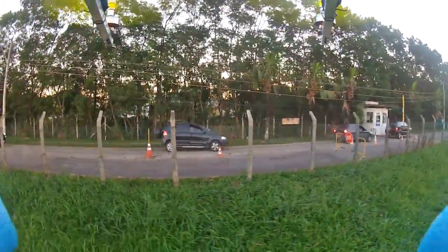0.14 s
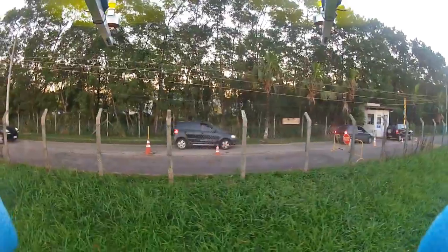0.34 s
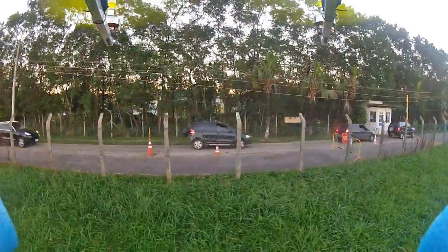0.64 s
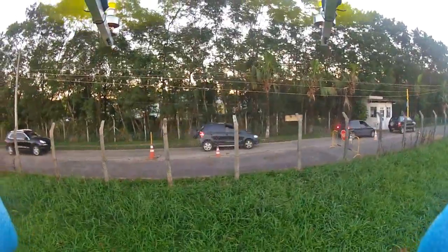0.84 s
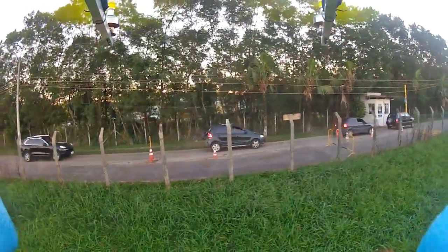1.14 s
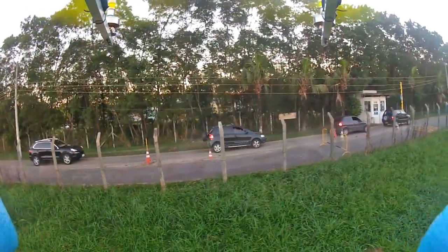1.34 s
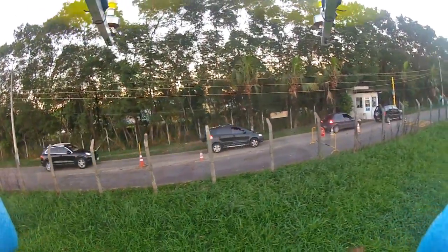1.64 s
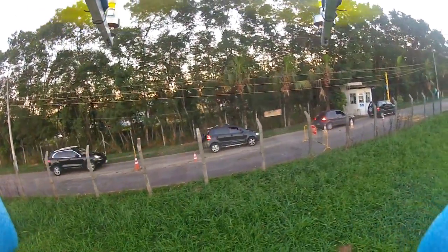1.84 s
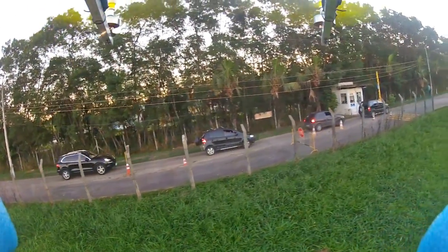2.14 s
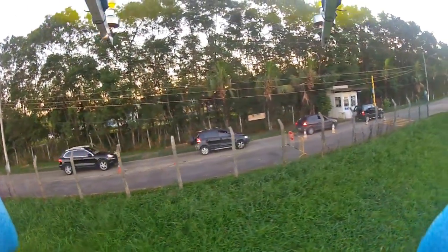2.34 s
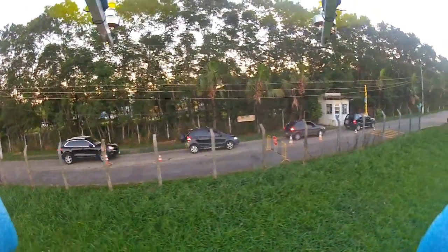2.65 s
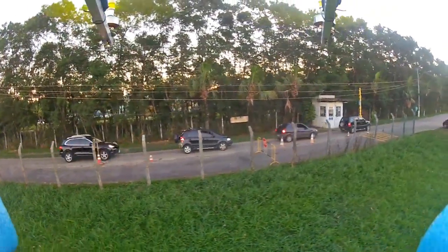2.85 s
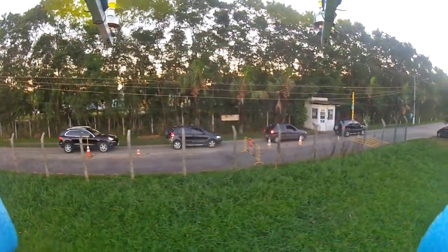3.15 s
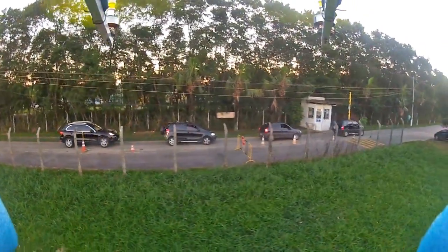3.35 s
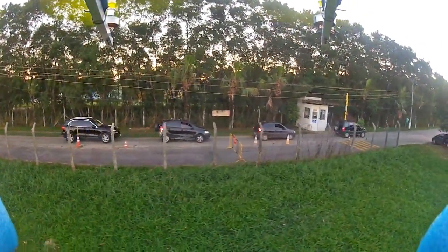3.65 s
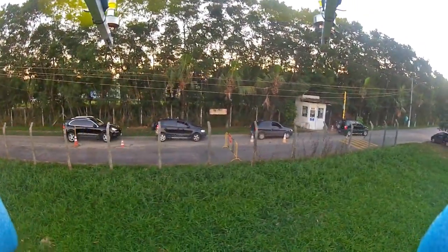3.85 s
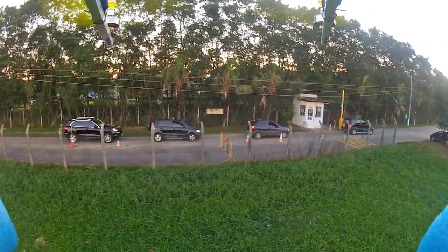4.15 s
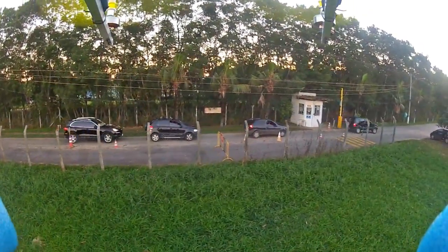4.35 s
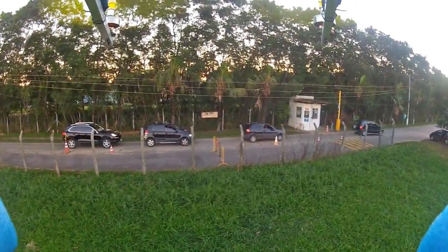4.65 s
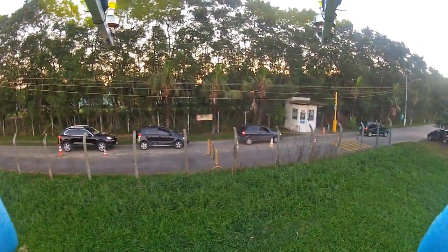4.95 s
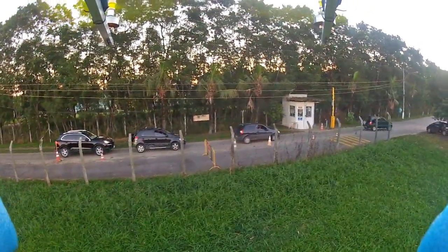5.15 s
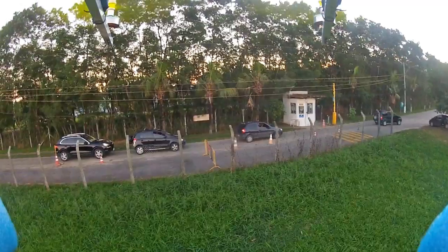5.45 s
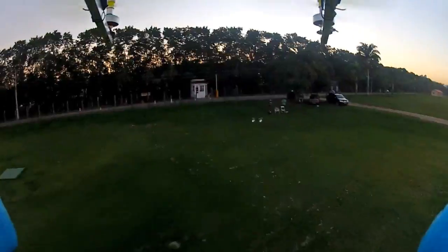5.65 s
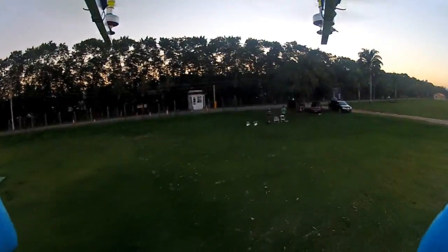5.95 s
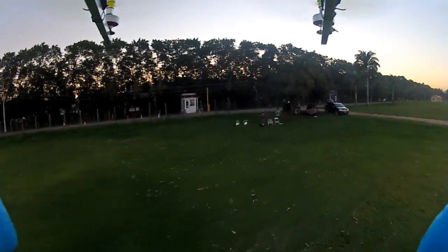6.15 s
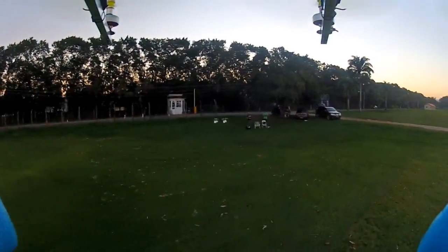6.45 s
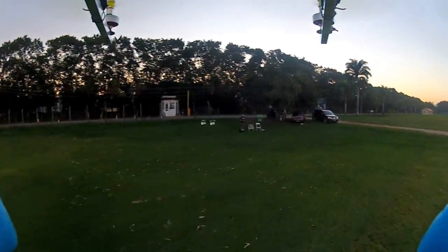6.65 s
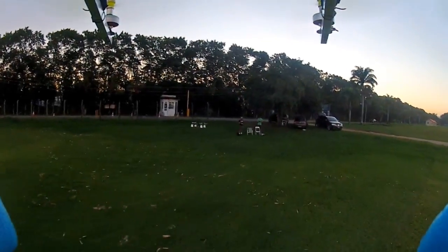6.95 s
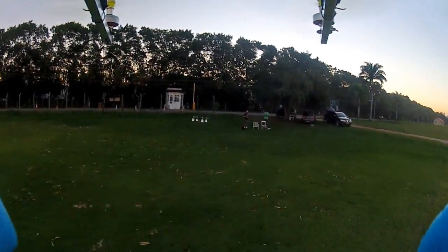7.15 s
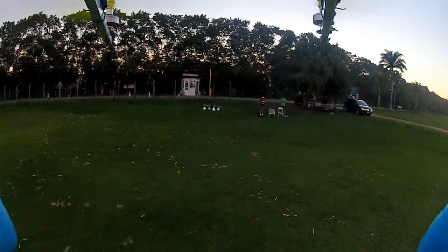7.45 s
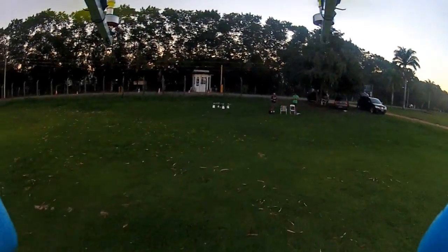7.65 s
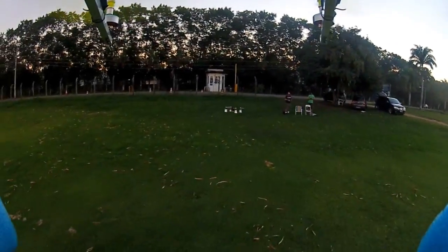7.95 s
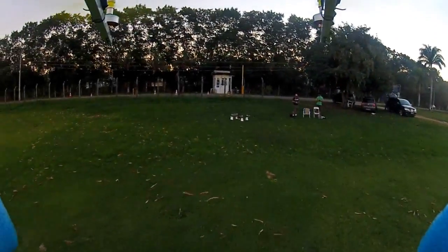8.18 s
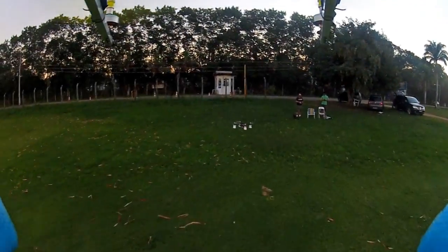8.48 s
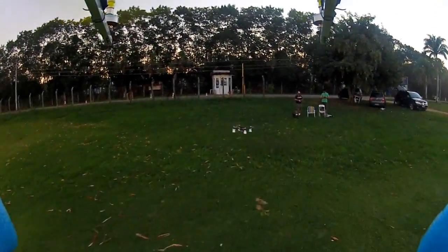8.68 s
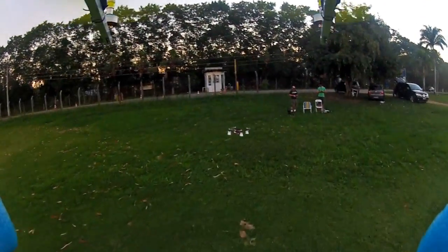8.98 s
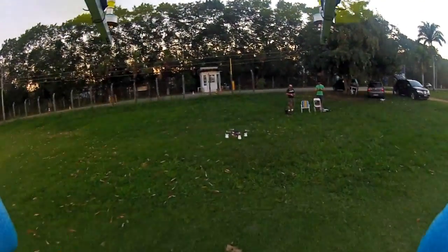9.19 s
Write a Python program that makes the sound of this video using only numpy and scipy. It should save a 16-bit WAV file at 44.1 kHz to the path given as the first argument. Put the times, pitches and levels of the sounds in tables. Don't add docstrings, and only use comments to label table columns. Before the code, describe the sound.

Close six-rotor drone buzz throughout, beating and fluttering in pitch, with faint case rattles, overloaded throbs and a sudden change partway through.

```python
import sys
import numpy as np
from scipy import signal
from scipy.fft import rfft, irfft, next_fast_len
from scipy.io import wavfile
from scipy.ndimage import uniform_filter1d

SR = 44100
rng = np.random.default_rng(int(sys.argv[2]) if len(sys.argv) > 2 else 0)


def file_out(sig):
    cols = np.atleast_2d(sig).T
    lim = np.clip(cols, -1, 1)
    pcm = np.round(lim * 32767).astype(np.int16)
    wavfile.write(sys.argv[1], SR, pcm)


N = 411012
CUT_S = 5.567
CLIP = 0.325
HOLD_HZ, CARD_HZ, TOP_HZ = 12000, 48000, 15250


def undb(db):
    return np.exp(np.asarray(db) * (np.log(10) / 20))


def unit(x):
    return x / np.sqrt(np.mean(x ** 2))


def curves(table):
    s, *columns = np.transpose(table)
    return np.array([np.interp(np.arange(N) / SR, s, c) for c in columns])


def walk(rate_hz, count=1):
    k = int(SR / rate_hz)
    held = np.repeat(rng.standard_normal((count, N // k + 1)), k, axis=1)
    slewed = uniform_filter1d(uniform_filter1d(held, k), k)
    return unit(slewed[:, :N])


def colour(x, gain_at):
    size = next_fast_len(N)
    hz = np.arange(1, size // 2 + 2) * SR / size
    return irfft(rfft(x, size) * gain_at(hz), size)[:N]


def response(table):
    hz, db = np.transpose(table)
    return lambda f: undb(np.interp(np.log(f), np.log(hz), db))


def ring(x, modes):
    def gain_at(hz):
        power = sum(undb(2 * db) / (1 + (2 * (hz - f) / w) ** 2) ** 1.755 for f, w, db in modes)
        return np.sqrt(power)
    return unit(colour(x, gain_at))


def by_take(first, second):
    first = np.reshape(first, (len(first), -1))
    second = np.reshape(second, (len(second), -1))
    return np.where(np.arange(N) < CUT_S * SR, first, second)


def per_rotor(table, column):
    return by_take(*np.array(table)[:, :, column])


# [f/Hz, level/dB per Hz]
WASH = [(20, -36), (60, -20), (95, -21), (140, -5.5), (300, 2), (420, -6.5), (520, -14), (800, -16.5),
        (1500, -17.5), (3000, -25.5), (4200, -56.5), (5800, -48)]


def wash():
    air = unit(colour(rng.standard_normal(N), response(WASH)))
    return air * undb(-33 + 1.2 * walk(8)[0])


# [t/s, peak level/dB]
TICKS = [(0.167, -52), (0.4226, -53), (0.5364, -38), (0.609, -51), (0.873, -46), (1.074, -52), (1.353, -51),
         (1.707, -45), (1.9545, -53), (2.2817, -51), (2.4753, -45), (2.7681, -52), (2.9941, -41),
         (4.0648, -48), (4.2729, -53), (4.6139, -50), (4.6954, -48), (4.78, -47), (4.8495, -52),
         (5.0742, -50), (5.22, -54), (5.2824, -43.5), (5.5618, -48), (6.6702, -38)]


def ticks():
    s, db = np.transpose(TICKS)
    kicks = np.zeros(N)
    kicks[(s * SR).astype(int) + 20] = undb(db + 27)
    return np.diff(kicks, prepend=0)


DRIFT_HZ = [(0, 171.5, 160.3, 161.8, 150.4, 135.5, 139.7), (.45, 167.5, 155, 154.7, 144.3, 144.9, 149.4),
            (.8, 164.4, 149, 140.7, 130.8, 148, 151.3), (1.4, 167.5, 151.6, 131.8, 120.9, 142.6, 147.7),
            (2.04, 162.6, 149.7, 141.4, 130.7, 147.6, 154.5),
            (2.75, 160.2, 147.8, 135, 125.9, 148.2, 152.1), (3.3, 154.9, 153, 147.5, 139.4, 148.3, 152.4),
            (4.1, 156.8, 149.3, 142.6, 135.1, 141.1, 147.5), (5.0, 156.9, 143.7, 126, 126, 142.9, 148),
            (5.55, 144.7, 142.4, 147.2, 141.3, 139.3, 144.3)]
# [t/s, blade rate f/Hz of rotors 1-6]
ROCK_HZ = [(5.57, 156.2, 138.3, 123.6, 132.2, 123.1, 137.4),
           (6.119, 166, 144.2, 120.5, 134.3, 111.2, 126.9), (6.5, 169.1, 146.5, 140.1, 134.7, 132, 132.5),
           (6.9, 162.6, 145.7, 166.7, 126.6, 118.2, 150.5), (7.4, 164.9, 146.2, 162.6, 123.7, 113, 140.2),
           (7.999, 152.6, 149.2, 144.4, 137.2, 138.1, 137.3),
           (8.75, 147.7, 155.5, 139, 124.7, 114.1, 136.5), (9.32, 148.1, 150.2, 142.1, 131.4, 127.6, 135.2)]


def blade_rates():
    takes = DRIFT_HZ, ROCK_HZ
    inertia_s = 0.12
    smooth = [uniform_filter1d(curves(take), int(inertia_s * SR), mode="nearest") for take in takes]
    rate_hz = by_take(*smooth)
    mean_hz = by_take(*(np.mean(take, axis=0)[1:] for take in takes))
    return rate_hz, rate_hz - mean_hz


# [t/s, extra swing level/dB]
SLAMS = [(1.472, 1.5), (2.65, 0), (5.561, 0), (5.669, 4), (5.953, 8), (6.426, 2), (6.935, 2.1), (7.085, 0),
         (7.48, 1.5), (8.231, 0.5), (8.607, -1), (9.169, 2.5)]


def in_step(shaft):
    at = ((np.transpose(SLAMS)[0] + .003) * SR).astype(int)
    miss = np.unwrap(-2 * shaft[:, at] % (2 * np.pi), axis=1) / 2
    return shaft + np.array([np.interp(np.arange(N), at, m) for m in miss])


def hold_swings(tones):
    t = np.arange(N) / SR
    slam_db = sum(db * np.exp(-((t - s - .003) / 0.0021) ** 2) for s, db in SLAMS)
    top = 0.29 * undb(slam_db)
    swing = uniform_filter1d(np.abs(signal.hilbert(tones, next_fast_len(N))[:N]), size=300)
    lull = undb(-6 * np.exp(-((t - .035) / 0.022) ** 2))
    return lull * tones / (1 + (swing / top) ** 6) ** (1 / 6)


def shaft_angles(rate_hz):
    speed_hz = rate_hz / 2 * (1 + 0.00391 * walk(30, count=6))
    shaft = in_step(2 * np.pi * np.cumsum(speed_hz, axis=1) / SR)
    return shaft + .06 * np.pi * (np.arange(N) < CUT_S * SR)


# [hum/dB, octave/dB, upper tones/dB, unbalance tones/dB]
NEAR_DB = [
    [(-28.5, -30, -6, -10.5), (-31, -35.5, -13.5, -8.5), (-26, -29, 3.5, -10), (-33, -25, -7.5, -4.5),
     (-26.5, -33.5, -11, -2), (-52, -36, -7, -25)],
    [(-30.5, -33.5, -10.5, -8), (-25.5, -23.5, -7, -11), (-28.5, -26.5, -11.5, -24), (-31.5, -28, -11, -9),
     (-37, -28.5, -10, -8.5), (-32, -36.5, -13.5, -13)],
]


def blades(shaft):
    chop = np.exp(1.08 * np.cos(4 * shaft)) * rng.standard_normal((6, N))
    air = unit(chop.sum(axis=0)) * undb(0.97 * walk(25)[0])
    passes = np.exp(300 * (np.cos(2 * shaft) - 1))
    slaps = (undb(3.0 * walk(60, count=6)) * passes).sum(axis=0)
    slaps = unit(colour(slaps, lambda hz: hz > 700))
    magnets = np.cos(14 * shaft) + .7 * np.cos(18 * shaft)
    whine = (undb(per_rotor(NEAR_DB, 2)) * magnets).sum(axis=0)
    return air + undb(-16.5) * slaps + undb(-29.5) * whine


# [f/Hz, width/Hz, level/dB]
LOW_RING = [(1024, 102, -4.5), (1126, 140, -7), (1283, 110, 1), (1374, 150, -7)]
HIGH_RING = [(1800, 200, 4.5), (1956, 237, 6), (2233, 170, 0), (2524, 168, 4.5), (2776, 70, 1.5),
             (3130, 55, -9), (3564, 290, -5)]
# [low ring level/dB, high ring level/dB, gustiness/dB]
CASE_DB = [
    (-31, -36.5, 0.75),
    (-35, -39, 0.75),
]


def case(drive):
    low_db, high_db, gust_db = by_take(*CASE_DB)
    gust = undb(gust_db * walk(20)[0])
    low = undb(low_db) * ring(drive, LOW_RING)
    high = undb(high_db + 1.06 * walk(16)[0]) * ring(drive, HIGH_RING)
    return gust * (low + high)


# [multiple of shaft rate, level/dB]
ORDERS_DB = [
    (1, -51.5),
    (3, -34),
    (5, -49.5),
    (6, -43.5),
    (8, -50.5),
    (10, -62),
]
# [hum/dB per Hz, octave/dB per Hz]
SWELL_DB_HZ = [
    [(-0.45, -.5), (.7, .1), (0.03, 0.09), (0.08, -.3), (-0, -0.6), (.1, 0.95)],
    [(0.17, 0.07), (0.18, 0.1), (0.35, -0.18), (0.26, 0.45), (0.091, -0.4), (0.11, 0.13)],
]
# [f/Hz, level/dB]
FRAME = [(110, -3.5), (160, 0.45), (250, -0.5), (320, -0.4), (420, 1.5), (520, -4), (580, 2.5), (640, -1)]


def hum(shaft, push_hz):
    fade_db = 2 * walk(3.5, count=12)
    hum_db = per_rotor(NEAR_DB, 0) + per_rotor(SWELL_DB_HZ, 0) * push_hz + fade_db[:6]
    octave_db = per_rotor(NEAR_DB, 1) + per_rotor(SWELL_DB_HZ, 1) * push_hz + fade_db[6:]
    tones = undb(hum_db) * np.cos(2 * shaft)
    tones = tones + undb(octave_db + 1.3 * walk(12, count=6)) * np.cos(4 * shaft + 1.1)
    t = np.arange(N) / SR
    lean_s, lean_db = 2.9, 9
    tilt_db = lean_db * np.clip((t - lean_s) / 0.28, -1, 0) * (t < CUT_S)
    upper = undb(per_rotor(NEAR_DB, 2) + tilt_db)
    unbalance = undb(per_rotor(NEAR_DB, 3))
    reach = upper, unbalance
    weak = sum(undb(db) * reach[order % 2] * np.cos(order * shaft) for order, db in ORDERS_DB)
    thump = undb(-79 + 3 * walk(3.6)) * np.cos(shaft)
    tones = tones + thump + undb(3.3 * walk(14, count=6)) * weak
    flutter = undb(1.68 * walk(25, count=6))
    summed = -np.sqrt(2) * (flutter * tones).sum(axis=0)
    return colour(summed, response(FRAME))


def scene():
    rate_hz, push_hz = blade_rates()
    shaft = shaft_angles(rate_hz)
    heard = wash() + ticks() + case(blades(shaft)) + hold_swings(hum(shaft, push_hz))
    port_hz = 45
    return colour(heard, lambda hz: hz / np.hypot(hz, port_hz))[None]


GRIT_DB = [
    (-39.5,),
    (-37,),
]


def grit(coarse):
    count = coarse.size
    swing = uniform_filter1d(coarse ** 2, size=120) / CLIP ** 2 + 0.039
    steps = np.repeat(rng.standard_normal(count // 128 + 1), 128)[:count]
    take_db = np.where(np.arange(count) < CUT_S * HOLD_HZ, *np.ravel(GRIT_DB))
    band = signal.butter(1, [2000, 5650], "band", fs=HOLD_HZ, output="sos")
    noise = signal.sosfilt(band, rng.standard_normal(coarse.shape))
    return undb(take_db + 2.8 * steps) * swing ** 0.62 * noise


def roll_off(x):
    return signal.sosfilt(signal.butter(12, 15600, fs=SR, output="sos"), x)


def record(dry):
    coarse = signal.resample_poly(dry, HOLD_HZ, SR, axis=1)
    clipped = np.clip(coarse + CLIP * grit(coarse), -CLIP, CLIP)
    held = np.repeat(clipped, CARD_HZ // HOLD_HZ, axis=1)
    held = signal.resample_poly(held, SR, CARD_HZ, axis=1)[:, :N]
    lowpass = signal.ellip(10, .1, 50, TOP_HZ, fs=SR, output="sos")
    mix = signal.sosfiltfilt(lowpass, held)
    return roll_off(mix)


dry = scene()
out = record(dry)
file_out(out)
```